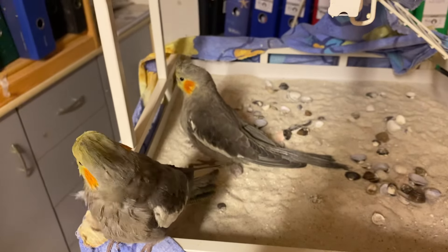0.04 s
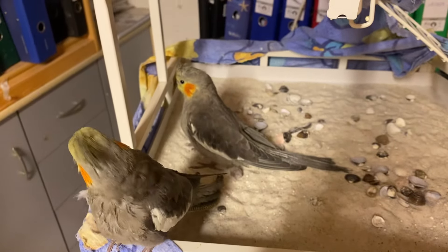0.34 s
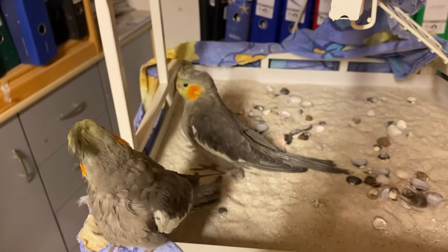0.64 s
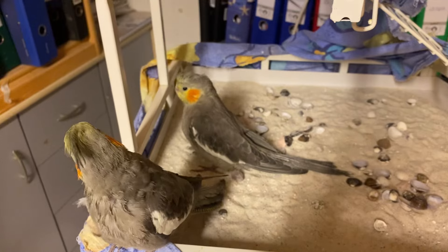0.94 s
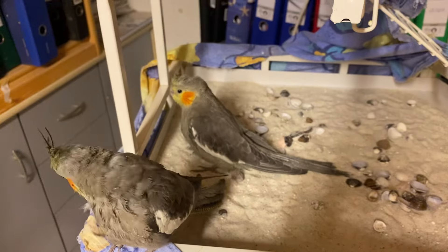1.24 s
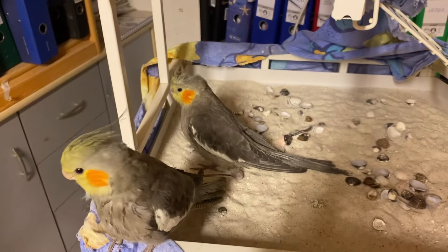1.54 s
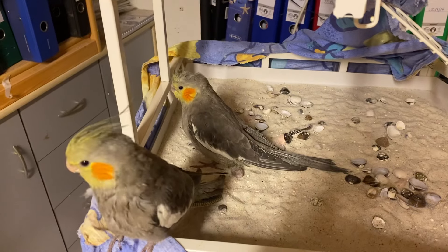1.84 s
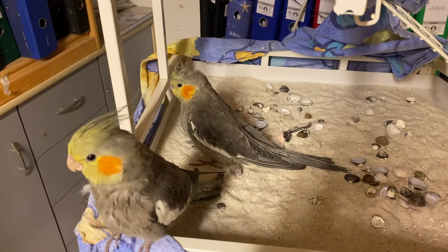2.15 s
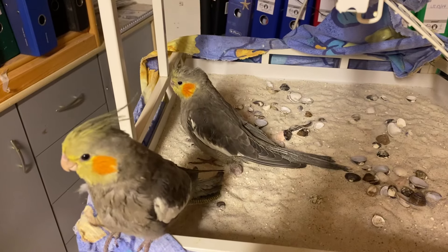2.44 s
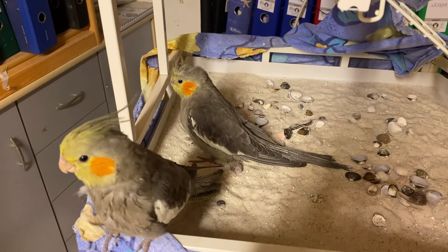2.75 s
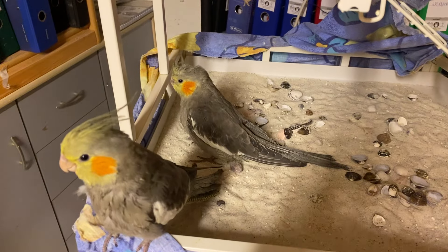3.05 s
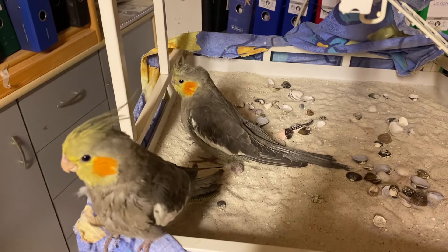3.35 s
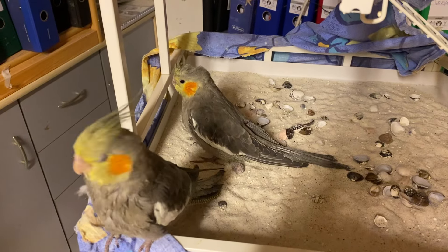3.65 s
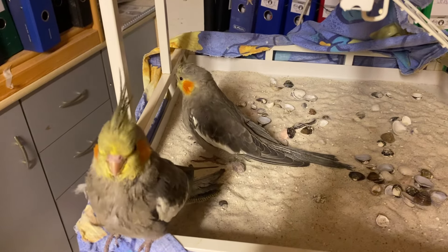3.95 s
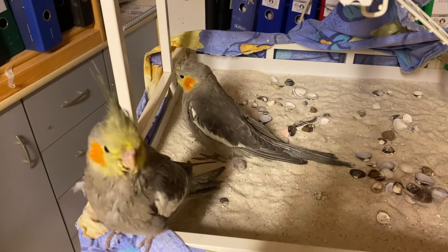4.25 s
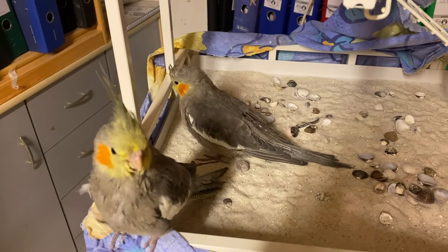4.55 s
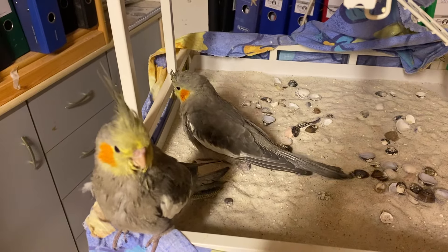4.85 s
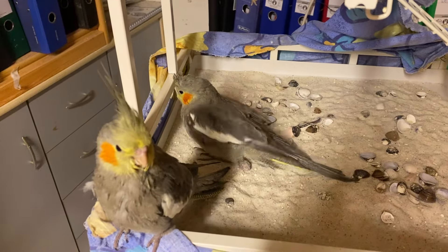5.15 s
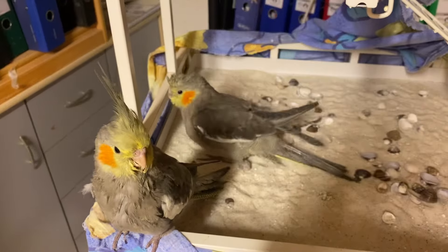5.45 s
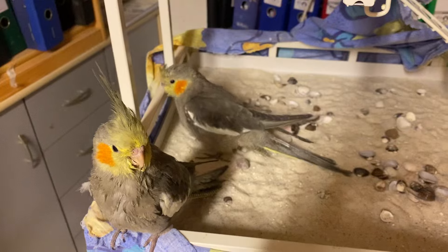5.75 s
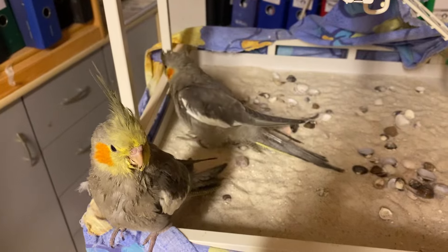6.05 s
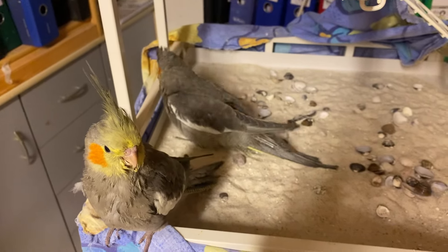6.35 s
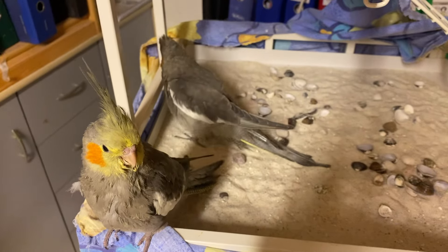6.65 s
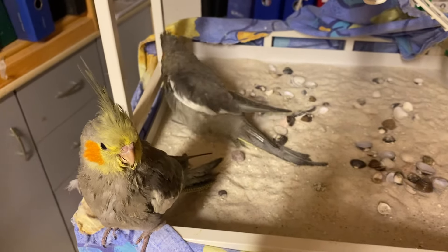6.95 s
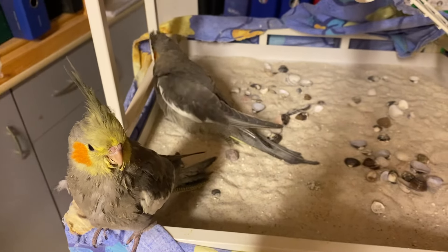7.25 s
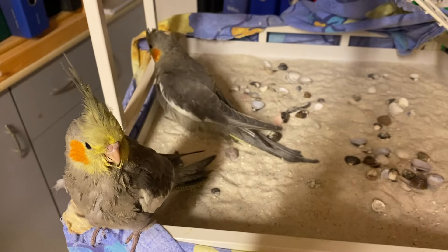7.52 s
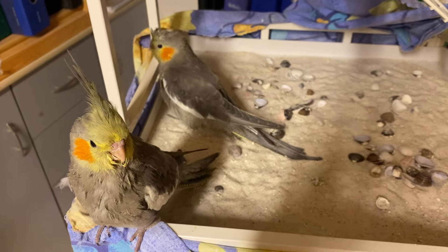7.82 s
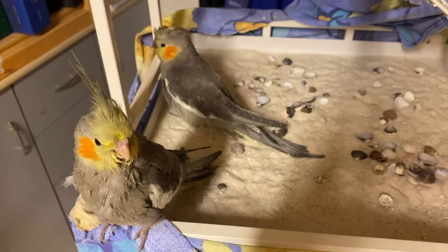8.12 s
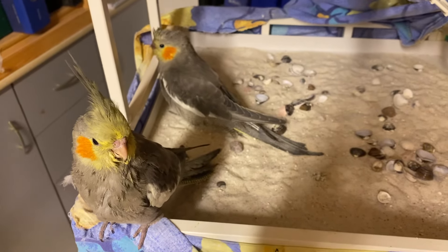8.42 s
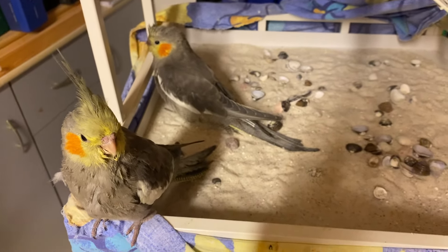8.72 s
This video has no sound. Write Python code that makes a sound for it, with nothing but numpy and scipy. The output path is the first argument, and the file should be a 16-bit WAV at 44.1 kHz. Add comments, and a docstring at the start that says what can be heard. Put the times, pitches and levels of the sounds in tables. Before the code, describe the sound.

In a small room, young cockatiels keep up a run of raspy whines, hisses and brief peeps, heard from close by. The begging builds, with a low rumble swelling briefly behind it, then drops back. After one quiet mew, beaks and claws click on shells, and more hoarse calls mix with sandy scuffs, faint feather swishes and soft bumps of the birds' tray.

```python
"""A small room, with the microphone close to two young cockatiels in a sand tray.
They beg with harsh hisses, air chopped by the syrinx and coloured by the throat, and with its voiced
sounds: short peeps, hoarse sliding whines and one soft low mew. Beaks and claws click on shells, feet
shuffle in the sand and bump the tray, and feathers brush. Tray and walls give a short answer;
behind it all lie a low rumble and faint room air."""
import sys
import numpy as np
from scipy import signal
from scipy.fft import rfft, irfft, next_fast_len
from scipy.io import wavfile
from scipy.ndimage import uniform_filter1d, map_coordinates

SR = 44100
rng = np.random.default_rng(int(sys.argv[2]) if len(sys.argv) > 2 else 0)


def wrap_up_sound(samples):
    """Save the sound to the file named by the first command line argument, as 16-bit audio."""
    columns = np.atleast_2d(samples).T
    # keep every value between -1 and 1, then stretch to whole-number steps
    tamed = np.clip(columns, -1, 1)
    steps = np.round(tamed * 32767).astype(np.int16)
    wavfile.write(sys.argv[1], SR, steps)


N = 396018

# Room air, and a low background rumble: (frequency [Hz], spectral level [dB])
AIR_SPECTRUM = [(12, -25.5), (20, -3), (86, -1), (143, -5.5), (480, -15), (1300, -26), (2000, -24.5),
                (3160, -28.5), (5000, -32.5), (7290, -32), (8340, -45), (10100, -37), (12500, -45),
                (16200, -78), (22000, -120)]
RUMBLE_SPECTRUM = [(12, -60.5), (20, -16), (71, 5.5), (134, -11), (198, -13.5), (323, -18.5), (386, -17.5),
                   (560, -26), (612, -21), (700, -20), (910, -53.5), (1540, -120)]
# The background rumble swells, then fades: (time [s], relative level [dB])
RUMBLE_LEVELS = [(2.65, -83), (2.832, -57), (3.234, -54.5), (3.552, -59.5), (3.814, -58), (4.15, -81)]
# Decay of the room's answer: (frequency [Hz], time to fall 60 dB [s])
ROOM_DECAY = [(200, .28), (1500, .23), (3500, .185), (7000, .17), (13000, .14)]
# Colour of that answer: (frequency [Hz], gain [dB])
ROOM_COLOUR = [(200, 3), (600, -2), (1300, 2), (3000, 3), (8000, 2), (14000, -2)]
# Lean of the close sounds across the microphone: (frequency [Hz], left boost and right cut [dB])
LEFT_LEAN = [(200, 0.5), (600, -1), (1200, -1), (2300, 0), (5000, 0), (10000, -1)]

# Soft bumps of the tray: (peak time [s], pitch [Hz], level [dB], half-width [s])
TRAY_BUMPS = [ (0.55, 48, -68, .02), (3.5, 75, -59, 0.014), (4.291, 62.6, -64.5, 0.017),
              (5.01, 140.7, -67.5, 0.048), (6.245, 56.3, -68.5, 0.016), (6.47, 80, -60.5, 0.045),
              (6.871, 135.3, -69, 0.029), (8.024, 93.5, -56.5, 0.017), (8.108, 93, -60, 0.038),
              (8.608, 83.4, -60.5, 0.029), (8.854, 144, -61.5, 0.007)]
# Feet scuffing the sand: (peak time [s], level [dB], time to fall 12 dB [s])
SCUFFS = [ (1.02, -61, 0.11), (2.3, -69.5, 0.23), (3.1, -60, 0.9), (3.65, -69.5, 0.14), (4.7, -76.5, 0.94),
          (5.6, -70, 0.17), (5.77, -68, 0.039), (5.9, -72.5, 0.071), (7.202, -60, 0.29), (7.655, -61, 0.26),
          (7.754, -66, 0.28), (8.07, -62.5, 0.59), (8.3, -67, 0.045), (8.47, -63, 0.21),
          (8.669, -60.5, 0.07)]
# Claws dragged through sand, and feathers brushing: (peak time [s], level [dB], half-width [s])
CLAW_SCRATCHES = [ (5.773, -84, 0.0052), (7.645, -71, 0.017), (7.757, -71, 0.0095), (7.985, -72.5, .015),
                  (8.05, -70, 0.0057), (8.1, -81, 0.0088), (8.378, -62.5, 0.0056), (8.531, -71.5, 0.022),
                  (8.866, -69, 0.012)]
FEATHER_SWISHES = [(5.186, -73.5, 0.013), (5.905, -74, .013), (6.085, -78.5, 0.02), (7.758, -73, 0.028)]
# Beaks and claws on shells: (time [s], relative knock level [dB], relative snap level [dB])
SHELL_CLICKS = [ (.264, -59, -71), (.519, -54, -38.5), (0.528, -77, -69), (1.645, -69, -77),
                (5.199, -79, -79), (5.396, -54.5, -55), (6.374, -56, -63), (6.3824, -51, -53),
                (6.396, -43.5, -46), (6.411, -46.5, -51), (6.4521, -42, -37), (6.4815, -47.5, -41),
                (6.488, -58, -47.5), (6.858, -56, -61), (6.866, -56, -54), (6.874, -49.5, -48),
                (6.8856, -44, -42.5), (6.9003, -45.5, -45.5), (6.9195, -45.5, -38.5), (6.927, -56.5, -44),
                (7.091, -62.5, -65.5), (7.843, -61, -82), (8.375, -77, -77), (8.577, -55.5, -73),
                (8.901, -66, -76)]
# Small hollow taps: (time [s], nominal pitch [Hz], relative level [dB])
HOLLOW_TAPS = [(.462, 805, -60.5), (1.67, 724, -60), (8.063, 960, -55), (8.844, 580, -49)]
# Colours of these movements, close up: (frequency [Hz], spectral level [dB])
THUD_SPECTRUM = [(30, -20), (80, 17), (180, 2), (400, -16), (900, -50), (2000, -98)]
SAND_SPECTRUM = [(100, 2), (400, 0.5), (1000, 4), (2000, -4), (3200, -8), (5000, -13.5), (8300, -21.5),
                 (10500, -29.5), (13000, -47.5)]
GRIT_SPECTRUM = [(300, -4), (1200, -1), (6000, 0), (11500, -19), (13000, -37)]
FEATHER_SPECTRUM = [(1500, -12), (4000, -2), (7000, 4), (10500, -4.5), (12500, -15), (14000, -35)]
KNOCK_SPECTRUM = [(100, -32), (350, -24), (700, -2.5), (1800, 3.5), (3000, -0.5), (4500, -7.5),
                  (7000, -31.5), (12000, -45), (14000, -72)]
SNAP_SPECTRUM = [(2000, -42.5), (5000, -7), (8000, -5), (9700, 5), (11400, 7), (12300, -2), (13100, -34),
                 (16000, -38)]

# Course of the mew: (time [s], pitch [Hz], level [dB], roughness [0-1])
MEW_CONTOUR = [(5.889, 903, -82, 1), (5.916, 859, -51, 0.73), (5.935, 859, -60.5, 0.84),
               (5.956, 706, -59.5, .8), (5.982, 851, -53.5, 0.23), (6.004, 812, -66, .1),
               (6.035, 927, -60.5, 0.07), (6.075, 1022, -67, 0.5), (6.11, 1085, -82, 0.7)]
# Its harmonics, from the fundamental up: (level [dB])
MEW_HARMONIC_DB = [7.5, 4, -8, -28]
# Short peeps: (start [s], length [s], pitch [Hz], slide [octaves/s], level [dB], roughness [0-1])
PEEP_CALLS = [ (0.81, 0.022, 2080, -8, -59.5, 0.44), (1.222, .03, 3300, -2.5, -54, 0.69),
              (1.468, 0.044, 3300, -1.5, -57.5, 0.53), (1.799, 0.044, 3110, -10, -51, 0.6),
              (2.253, 0.021, 2450, -8.5, -51, 0.53), (3.039, 0.033, 3248, -3, -36.5, 0.87),
              (3.772, 0.038, 3194, -5.5, -45, 0.96), (5.015, 0.027, 3280, 1.5, -46, 0.47),
              (6.724, 0.024, 2927, 0, -35.5, 0.13)]
# Harsh hisses: (start [s], rise [s], fall [s], level [dB], relative sharpness [dB])
HISS_CALLS = [ (0.551, 0.013, 0.044, -48, -5.5), (.889, 0.039, 0.0073, -44.5, -5.5),
              (.966, 0.066, 0.01, -42.5, -2), (1.985, 0.087, 0.02, -42, -5),
              (2.345, 0.035, 0.03, -40.5, -1.5), (2.695, 0.035, 0.043, -37, 6),
              (2.752, 0.033, 0.016, -33, 9), (2.815, 0.023, 0.037, -36, 1.5),
              (3.139, 0.022, 0.1, -37.5, 5.5), (3.365, 0.033, 0.04, -33, 3.5),
              (3.503, 0.033, 0.054, -32, 4.5), (3.874, 0.081, 0.031, -37.5, 3.5),
              (5.454, 0.026, 0.06, -64.5, 18), (7.112, 0.037, 0.036, -37.5, -1),
              (7.251, 0.023, 0.031, -45, -10.5), (8.108, 0.036, 0.012, -48.5, -12),
              (8.242, 0.025, 0.037, -53, -13), (8.929, 0.019, 0.022, -55.5, -15.5)]
# Resonances of the throat: (centre [Hz], width [Hz], lift [dB])
THROAT_RESONANCES = [(1530, 490, 6), (2670, 200, 7), (3340, 500, 1), (4090, 810, 8.5), (6370, 905, 7.5),
                     (9800, 3200, 4.5)]
# Hoarse whines, each a croak, a whistle and a tail:
# (start [s], croak rise [s], upper voice [Hz], its level [dB], lower voice [Hz], its level [dB],
# time to whistle peak [s], length [s], pitch [Hz], slide [octaves/s], level [dB], roughness [0-1],
# tail peak after whistle peak [s], tail pitch [Hz], tail level [dB])
WHINE_CALLS = [(-0.0, 0.0048, 3300, -50, 1870, -49, 0.01, 0.059, 2584, -3.5, -56.5, 0, 0.026, 1950, -81),
               (0.293, 0.045, 3335, -56, 1860, -59.5, 0.086, 0.074, 3706, 2, -54.5, 0.88, 0.016, 2050, -75),
               (0.57, 0.042, 3587, -47, 1860, -67, 0.037, 0.05, 2630, -1, -46.5, 0.1, 0.1, 2780, -75),
               (0.753, 0.033, 3140, -56.5, 2370, -61, 0.076, 0.059, 1997, 1.5, -55, 0.23, 0.025, 1410, -63),
               (1.13, 0.0074, 2613, -54.5, 1720, -62, 0.071, 0.14, 3170, -4.5, -54, 0.45, 0.082, 1110, -69),
               (1.358, 0.04, 3570, -60, 2530, -56.5, 0.074, 0.073, 1930, 0, -56, 0.4, 0.018, 1367, -67),
               (1.441, 0.037, 3007, -57, 2410, -61, 0.068, 0.063, 2520, -10, -58.5, 0.4, 0.014, 1370, -66.5),
               (1.686, 0.036, 3535, -49.5, 2830, -59.5, 0.066, 0.049, 1834, 0.5, -52, 0.11, 0.028, 2080, -68),
               (1.761, 0.048, 2980, -53.5, 2940, -66, 0.05, 0.028, 2500, -9.5, -45.5, 0, 0.042, 2630, -77),
               (1.918, 0.021, 2770, -75, 2820, -54, 0.018, 0.033, 3420, -2, -50, 0.27, 0.051, 2630, -51.5),
               (1.967, 0.026, 4520, -50, 2110, -73, 0.078, 0.15, 2430, 2, -66, 0.8, 0.017, 1620, -69),
               (2.151, 0.037, 3300, -56, 1930, -58.5, 0.115, 0.034, 2218, -2.5, -45, 0.36, 0.018, 1760, -55.5),
               (2.468, 0.036, 2380, -56.5, 1660, -52, 0.067, 0.095, 2663, -9.5, -51.5, 0.74, 0.052, 1640, -87),
               (2.585, 0.0063, 2630, -76, 1120, -63, 0.049, 0.043, 1663, 1, -56, 0.04, 0.086, 1566, -62),
               (2.766, 0.065, 2860, -41.5, 2440, -62, 0.04, 0.14, 3580, 3, -33, 0.5, 0.027, 1540, -61),
               (2.924, 0.066, 3040, -42.5, 2000, -48.5, 0.12, 0.11, 3136, -2, -35, 0.58, 0.026, 1915, -46.5),
               (3.177, 0.0091, 3590, -45, 3840, -34, 0.06, 0.14, 3252, 3.5, -34, 0.5, 0.023, 2340, -53),
               (3.567, 0.029, 3274, -30, 2740, -37, 0.012, 0.17, 3140, 2, -47, 0.8, 0.023, 2270, -65),
               (3.661, 0.046, 3660, -47, 2240, -45, 0.11, 0.17, 3082, 1.9, -39.5, 0.54, 0.03, 1990, -45.5),
               (3.884, 0.044, 3175, -38.5, 2750, -38.5, 0.04, 0.14, 3925, -0.0, -39.5, 0.77, 0.021, 1740, -54),
               (4.057, 0.031, 3680, -59, 2570, -56.5, 0.11, 0.079, 2650, -7, -57.5, 0.2, 0.015, 1600, -64),
               (4.253, 0.043, 2910, -62, 1960, -53.5, 0.091, 0.11, 2140, -0.5, -62, 0.25, 0.069, 1598, -65.5),
               (4.52, 0.034, 4000, -59.5, 2190, -54.5, 0.043, 0.047, 3316, -2, -57, 0.57, 0.061, 1776, -65),
               (4.747, 0.0096, 3840, -59, 2040, -51, 0.036, 0.082, 2002, -4, -58.5, 0.75, 0.0089, 1295, -67),
               (4.791, 0.034, 2734, -54, 2000, -61, 0.056, 0.077, 2210, -6.5, -59, 0.24, 0.051, 1482, -63),
               (4.928, 0.03, 3560, -55.5, 2280, -54, 0.066, 0.06, 3095, 2, -41.5, 0.31, 0.084, 1513, -57),
               (5.435, 0.0387, 3876, -44, 2480, -88, 0.048, 0.061, 2540, -7, -46.5, 0.5, 0.038, 1595, -47.5),
               (6.101, 0.054, 2560, -69, 1970, -61.5, 0.082, 0.083, 1854, -1.5, -60.5, 0.22, 0.022, 1390, -62),
               (6.625, 0.018, 3680, -55.5, 2370, -55.5, 0.093, 0.044, 2990, -1.5, -50, 0.3, 0.038, 2110, -51.5),
               (6.676, 0.0061, 3224, -47, 1620, -53, 0.054, 0.16, 3366, 1, -49.5, 0.7, 0.019, 2480, -60),
               (7.158, 0.011, 3970, -39, 1650, -46, 0.043, 0.15, 3190, 1.5, -42, 1.01, 0.063, 1750, -72),
               (7.392, 0.022, 2640, -58, 2640, -66, 0.062, 0.053, 2242, -2, -50, 0.5, 0.016, 1594, -60),
               (7.519, 0.015, 2260, -78, 1280, -63, 0.038, 0.13, 1680, 1, -64, 0.75, 0.066, 1107, -61),
               (7.681, 0.033, 3270, -78, 1800, -70, 0.039, 0.15, 2060, -0.5, -65.5, 0.9, 0.022, 1047, -70),
               (7.868, 0.028, 3180, -49.5, 2760, -48.5, 0.039, 0.09, 2903, 2.5, -46, 0.51, 0.028, 2174, -60),
               (8.225, 0.039, 3730, -59, 3480, -61, 0.033, 0.03, 4180, -3, -49, 0, 0.028, 2230, -52),
               (8.429, 0.033, 3455, -53.5, 1350, -55.5, 0.034, 0.077, 2367, 2, -53.5, 0.63, 0.064, 1247, -61),
               (8.662, 0.013, 4010, -64, 2410, -60.5, 0.04, 0.061, 3534, -1, -45, 0.72, 0.058, 1727, -54.5),
               (8.737, 0.0047, 3060, -58, 2500, -48, 0.023, 0.091, 3650, 2, -47.5, 0.36, 0.032, 2034, -57)]
# Lines around a rough whistle: (ratio to its pitch [1], relative level [dB])
ROUGH_PARTIALS = [(2 / 3, -21.5), (5 / 6, -3), (7 / 6, -2.5), (5 / 3, -14.5), (7 / 3, -27.5), (2, -16)]
# The mew's rasp, the hissing throat and husky breath: (frequency [Hz], spectral level [dB])
RASP_SPECTRUM = [(500, -19), (1100, -7.5), (1500, 4), (2300, 1.5), (3500, -10.5), (5000, -30), (9000, -46)]
THROAT_SPECTRUM = [(300, -56), (650, -35.5), (1050, -15.5), (1600, -11.5), (2700, -1.5), (3900, 0),
                   (5200, 1), (6800, -6.5), (9200, -13.5), (10500, -21), (12000, -37), (13000, -60)]
HUSK_SPECTRUM = [(500, -28), (1000, -11.5), (1600, 0), (2400, 0.5), (3600, -12), (4600, -10), (5600, -32),
                 (7200, -14), (9000, -31), (12000, -48.5)]


def amp(db):
    """Decibels to gain."""
    return 10 ** (np.asarray(db) / 20)


def unit(x):
    """Scaled to rms 1."""
    return x / np.sqrt(np.mean(np.abs(x) ** 2) + 1e-20)


def along(points, hz):
    """(frequency [Hz], value) points read on a log axis."""
    knots_hz, values = np.transpose(points)
    return np.interp(np.log(hz + 1), np.log(knots_hz + 1), values)


def wobble(n, rate):
    """A smooth random curve, rate knots a second."""
    return map_coordinates(rng.standard_normal(int(n * rate / SR) + 4), [np.arange(n) * rate / SR])


def filtered(x, response):
    """x times a response of frequency."""
    n = x.shape[-1]
    padded = next_fast_len(n + 4096)
    return irfft(rfft(x, padded) * response(np.fft.rfftfreq(padded, 1 / SR)), padded)[..., :n]


def coloured(x, spectrum):
    """x shaped by the given spectrum, at rms 1."""
    return unit(filtered(x, lambda hz: amp(along(spectrum, hz))))


def add(track, start, sound):
    """Mix a sound into the track at start seconds."""
    i = max(round(start * SR), 0)
    track[i:i + len(sound)] += sound[:max(N - i, 0)]


def grains(per_s):
    """Tiny impacts at random times and strengths."""
    return (rng.random(N) < per_s / SR) * rng.standard_normal(N)


def strokes(rows):
    """Gain with one bell-shaped swell for each row."""
    t = np.arange(N) / SR
    return sum(amp(db) * np.exp(-((t - peak) / width) ** 2 / 2) for peak, db, width in rows)


def background(spectrum, bass_side_db):
    """Stereo noise of rms 1, narrow in the bass and wide in the treble."""
    mid, side = coloured(rng.standard_normal((2, N)), spectrum)
    side = filtered(side, lambda hz: amp(along([(120, bass_side_db), (700, -1.1)], hz)))
    return unit(np.array([mid + side, mid - side]))


def rumble(steady_db=-79):
    """A low background rumble that swells from about 2.7 to 4 s, then fades."""
    times, levels = np.transpose(RUMBLE_LEVELS)
    swell_db = np.interp(np.arange(N) / SR, times, levels, left=-120, right=-120) + 0.5
    return np.hypot(amp(steady_db), amp(swell_db)) * background(RUMBLE_SPECTRUM, bass_side_db=-10.5)


def room(x, wet_db, lead, move_s=0.3):
    """Direct sound, lead samples earlier on the left, plus a short answer from tray and walls."""
    wet, hop = np.zeros((2, N + SR)), round(move_s * SR)
    starts = np.arange(0, N, hop)
    # The birds move, so each answer crossfades into a new one.
    for i, noise in zip(starts, rng.standard_normal((len(starts), 2, SR // 5))):
        span = np.arange(max(i - hop, 0), min(i + hop, N))
        if np.any(x[span]):
            offset = span - i if i < starts[-1] else np.minimum(span - i, 0)
            piece = x[span] * np.cos(np.pi / 2 * offset / hop)
            hz, t, bands = signal.stft(noise, SR, nperseg=256)
            decay = amp(-60 * t / along(ROOM_DECAY, hz)[:, None])
            tail = signal.istft(bands * decay, SR, nperseg=256)[1]
            answer = signal.fftconvolve(piece[None], tail / np.linalg.norm(tail[0]), axes=1)
            arrival = span[0] + SR // 700
            wet[:, arrival:arrival + answer.shape[1]] += answer
    wet = filtered(wet[:, :N], lambda hz: amp(along(ROOM_COLOUR, hz)))
    direct = filtered(x, lambda hz: np.exp(1j * np.pi * hz * lead / SR * np.array([[1], [-1]])))
    return (direct + amp(wet_db) * wet) / np.hypot(1, amp(wet_db))


def tray_bumps():
    """Shifting weight sets the tray booming softly, with a dull thud."""
    t, out = np.arange(N) / SR, np.zeros(N)
    thud = 1.03 * coloured(rng.standard_normal(N), THUD_SPECTRUM)
    for peak, hz, db, width in TRAY_BUMPS:
        boom = np.sin(2 * np.pi * hz * (t - peak))
        out += strokes([(peak, db, width)]) * (boom + thud)
    return out


def feathers():
    """Wing and tail feathers brush past each other in soft, bright swishes."""
    return strokes(FEATHER_SWISHES) * coloured(grains(per_s=5000), FEATHER_SPECTRUM)


def scratches():
    """A claw flicks a short spray of dry grains."""
    return strokes(CLAW_SCRATCHES) * coloured(grains(per_s=2600), GRIT_SPECTRUM)


def shuffle(fidget_db=-94, rise_share=0.32):
    """Sand slips in clumps under the feet; each scuff swells out of a faint stirring and fades."""
    t, power = np.arange(N) / SR, amp(fidget_db) ** 2
    for peak, db, fall in SCUFFS:
        from_peak = np.maximum((peak - t) / rise_share, t - peak) / fall
        power = power + amp(db - 12 * from_peak) ** 2
    clumps = amp(6 * wobble(N, 45))
    return np.sqrt(power) * coloured(grains(per_s=3200) * clumps, SAND_SPECTRUM)


def hollow_taps(t60_s=0.043):
    """Small taps ring briefly, their pitch dropping at once."""
    out, t = np.zeros(N), np.arange(SR // 20) / SR
    envelope = amp(-60 * t / t60_s) * (1 - np.exp(-t / 0.0054))
    for start, hz, db in HOLLOW_TAPS:
        pitch = hz * (0.643 + 0.94 * np.exp(-t / 0.00475))
        add(out, start, amp(db + 7.5) * envelope * np.sin(2 * np.pi * np.cumsum(pitch) / SR))
    return out


def shell_clicks(knock_t60_s=0.0097, snap_t60_s=0.0067, scrape_t60_s=0.035):
    """Beak or claw meets shell: a dull knock and a bright snap, with a little scraping after."""
    out, t = np.zeros(N), np.arange(SR // 20) / SR
    for start, knock_db, snap_db in SHELL_CLICKS:
        scrape = amp(-24 - 60 * t / scrape_t60_s + 1.4 * wobble(len(t), 470))
        knock = amp(knock_db) * coloured(rng.standard_normal(len(t)), KNOCK_SPECTRUM)
        knock *= amp(-60 * t / knock_t60_s) + scrape
        snap = amp(snap_db) * coloured(rng.standard_normal(len(t)), SNAP_SPECTRUM)
        snap *= amp(-60 * t / snap_t60_s) + scrape
        add(out, start, amp(5) * (knock + snap))
    return out


def breath(start, peak, end, edge_db, shape, attack_s):
    """Times and gain of one call: pressure builds to the peak, then gives out."""
    t = start + np.arange(int((max(end - start, 0) + 0.046) * SR)) / SR
    from_peak = np.maximum((peak - t) / max(peak - start, .004), (t - peak) / max(end - peak, .004))
    fades = np.clip((t - start) / attack_s, 0, 1) * np.clip((t[-1] - t) / 0.016, 0, 1)
    return t, amp(-edge_db * np.abs(from_peak) ** shape) * fades


def flutter(n, hz, scatter, depth):
    """The syrinx opens and shuts at an uneven rate; rms 1."""
    turns = np.cumsum(hz * np.exp(scatter * wobble(n, hz))) / SR
    return unit(np.exp(depth * np.cos(2 * np.pi * turns)))


def voiced(pitch, harmonic_db):
    """The harmonic tone of the syrinx, following a pitch curve in Hz; rms 1."""
    phase = 2 * np.pi * np.cumsum(pitch) / SR
    return unit(sum(amp(db) * np.sin(k * phase) for k, db in enumerate(harmonic_db, 1)))


def mew():
    """A quiet voiced note that starts with a rasp, dips, then clears as it rises."""
    times, *columns = np.transpose(MEW_CONTOUR)
    t, out = np.arange(times[0], times[-1], 1 / SR), np.zeros(N)
    pitch, db, rough = (np.interp(t, times, column) for column in columns)
    shake = (.012 + .05 * rough) * wobble(len(t), 500)
    voice = voiced(pitch * (1 + shake), MEW_HARMONIC_DB)
    rasp = coloured(rng.standard_normal(len(t)), RASP_SPECTRUM)
    rasp *= flutter(len(t), hz=170, scatter=.48, depth=.8)
    add(out, times[0], amp(db) * (voice + amp(-1) * rough * rasp) / np.hypot(1, rough))
    return out


def peeps(edge_s=0.0013):
    """For a moment the syrinx locks into a rasping tone with two overtones, then stops short."""
    out = np.zeros(N)
    for start, length, hz, slide, db, rough in PEEP_CALLS:
        t = np.arange(int(length * SR)) / SR
        shake = (.01 + .06 * rough) * wobble(len(t), 550)
        tone = voiced(hz * 2 ** (slide * t) * (1 + shake), harmonic_db=(0, -23.5, -28))
        gate = np.clip(np.minimum(t, length - t) / edge_s, 0, 1)
        chop = flutter(len(t), hz=210, scatter=.25, depth=.2 + .6 * rough)
        add(out, start, amp(db) * gate * tone * chop)
    return out


def throat(air, sharp_db, tuning):
    """The throat colours the air; tuning scales its resonances, and the gape trades lows for treble."""
    gape = [(1000, -.6 * sharp_db), (2800, .01), (3600, .0041),
            (5500, sharp_db), (10000, 1.3 * sharp_db)]

    def response(hz):
        lift = sum(db / (1 + (2 * (hz - centre * tuning) / width) ** 2)
                   for centre, width, db in THROAT_RESONANCES)
        return amp(along(THROAT_SPECTRUM, hz) + along(gape, hz) + lift)
    return unit(filtered(air, response))


def hisses():
    """Air chopped by the fluttering syrinx rushes through a throat whose resonances sink in each call."""
    out = np.zeros(N)
    for start, rise, fall, db, sharp_db in HISS_CALLS:
        peak = start + rise
        t, gain = breath(start, peak, peak + fall, edge_db=13, shape=.87, attack_s=.0085)
        air = rng.standard_normal(len(t)) * flutter(len(t), hz=230, scatter=.35, depth=.75)
        tuning = np.exp(0.085 * rng.standard_normal())
        early = throat(air, sharp_db - 5.5, tuning * 1.171)
        late = throat(air, sharp_db - 2.5, tuning)
        closing = np.clip(.5 + (t - peak) / 0.0064, 0, 1)  # the beak starts to close around the peak
        add(out, start, amp(db) * gain * unit((1 - closing) * early + closing * late))
    return out


def whistle(rise, fall, hz, slide, db, rough):
    """A sliding note that stumbles in syllables; roughness shakes it, splits it and adds husk."""
    syllable_s, accent_db, jump_share = .02, 1.8, .02
    sag_s, sag_share = .04, .06
    t, gain = breath(0, rise, rise + fall, edge_db=18, shape=1.054, attack_s=.013)
    n, rough = len(t), np.clip(rough, 0, 1)
    shake = (.018 + .04 * rough) * wobble(n, 500) + .018 * wobble(n, 70)
    sag = sag_share * np.clip((t - rise) / sag_s, 0, 1.5) ** 2  # pitch sags as pressure gives out
    glide_hz = hz * 2 ** (slide * (t - rise)) * (1 - sag)
    syllable = np.cumsum(rng.random(n) < 1 / (syllable_s * SR))
    jump, accent = uniform_filter1d(rng.standard_normal((2, n))[:, syllable], size=90)
    phase = 2 * np.pi * np.cumsum(glide_hz * (1 + shake + jump_share * jump)) / SR
    lines = np.zeros(n)
    for ratio, level in ROUGH_PARTIALS:
        line_db = level + along(HUSK_SPECTRUM, ratio * glide_hz) / 2 + 3.7 * wobble(n, 46)
        lines += amp(line_db) * np.sin(ratio * phase + rng.uniform(0, 2 * np.pi))
    clear = np.sin(phase) + amp(-24.5) * np.sin(2 * phase) + amp(-42) * np.sin(3 * phase)
    tone = unit(clear + (0.02 + 0.87 * rough) * lines)
    husk, husk_share = coloured(rng.standard_normal(n), HUSK_SPECTRUM), .25 * rough ** 4
    voice = np.sqrt(1 - husk_share) * tone + np.sqrt(husk_share) * husk
    chop = flutter(n, hz=180, scatter=.3, depth=.25 + .5 * rough)
    return amp(db + accent_db * accent) * gain * voice * chop


def whines(croak_end_share=0.67, rise_share=0.45, tail_rise_s=0.03, tail_fall_s=0.034):
    """Each whine starts as a two-voiced croak, clears into a whistle and breaks into a low tail."""
    out = np.zeros(N)
    for (start, croak_rise, upper_hz, upper_db, lower_hz, lower_db,
         to_peak, length, hz, slide, db, rough, tail_delay, tail_hz, tail_db) in WHINE_CALLS:
        croak_fall = max(croak_end_share * to_peak - croak_rise, .02)
        for voice_hz, voice_db in (upper_hz, upper_db), (lower_hz, lower_db):
            add(out, start, whistle(croak_rise, croak_fall, voice_hz, slide=-3, db=voice_db, rough=.55))
        peak, rise = start + to_peak, rise_share * length
        add(out, peak - rise, whistle(rise, length - rise, hz, slide, db, rough))
        tail = whistle(tail_rise_s, tail_fall_s, tail_hz, slide=-5.5, db=tail_db, rough=.63)
        add(out, peak + tail_delay - tail_rise_s, tail)
    return out


def scene():
    """Birds and tray close to the microphone, the calls a little left, rumble and room air behind."""
    calls = room(hisses(), wet_db=7, lead=1.6)
    calls += room(whines(), wet_db=0.5, lead=1.95)
    calls += room(mew(), wet_db=-0.5, lead=-3.5)
    calls += room(peeps(), wet_db=-9.5, lead=2.5)
    movement = room(shell_clicks() + hollow_taps(), wet_db=-3.5, lead=2.2)
    movement += room(shuffle(), wet_db=1, lead=2)
    movement += room(scratches() + feathers(), wet_db=-7.5, lead=1.5)
    leftward = np.array([[1], [-1]])
    close = calls * amp(.5 * leftward) + movement
    close = filtered(close, lambda hz: amp(along(LEFT_LEAN, hz) * leftward))
    low = (rumble() + tray_bumps()) * amp(-.8 * leftward)
    air = amp(-76) * background(AIR_SPECTRUM, bass_side_db=-13.5)
    return close + low + air


def record(dry):
    """The recorder keeps nothing above its band limit."""
    top_hz = 15900
    return filtered(dry, lambda hz: hz < top_hz)


dry = scene()
out = record(dry)
wrap_up_sound(out)
```